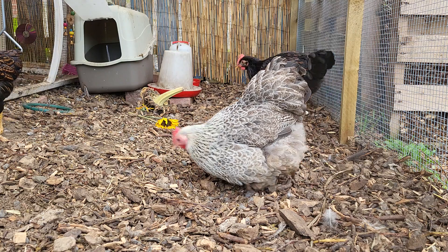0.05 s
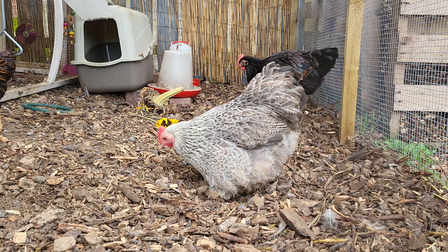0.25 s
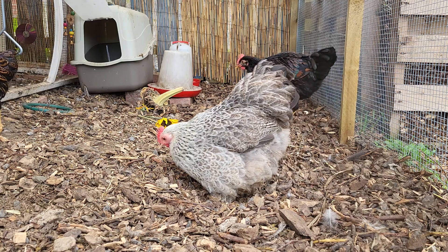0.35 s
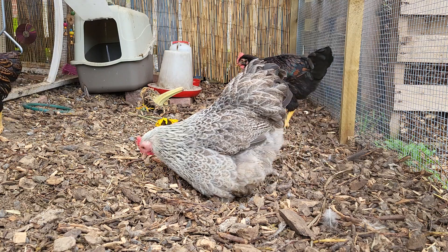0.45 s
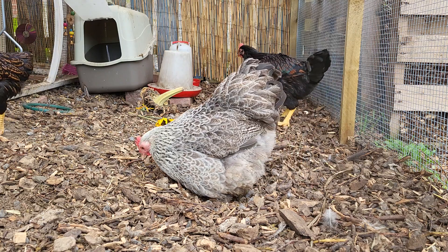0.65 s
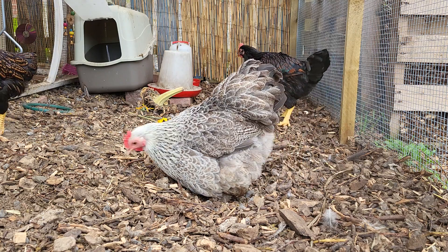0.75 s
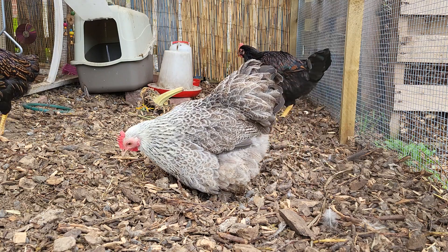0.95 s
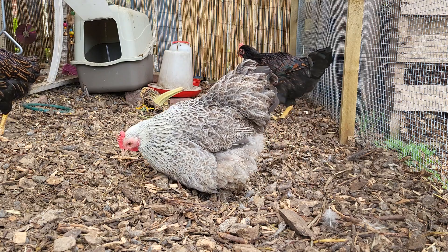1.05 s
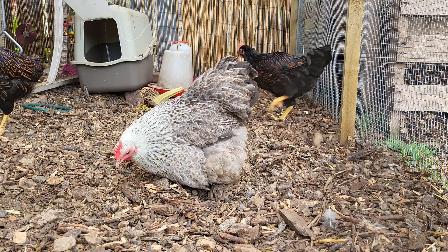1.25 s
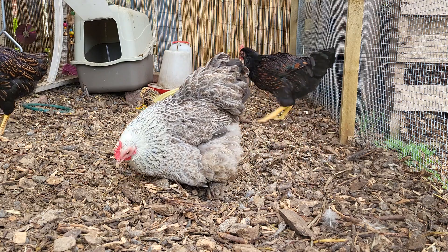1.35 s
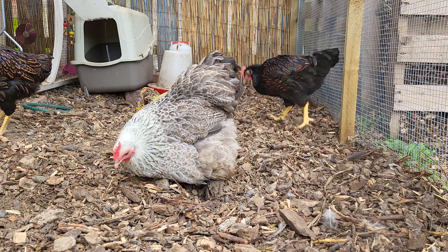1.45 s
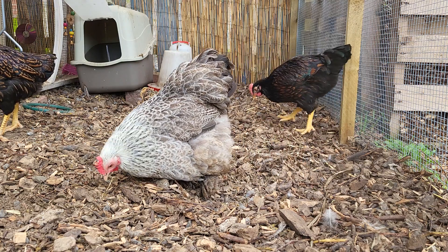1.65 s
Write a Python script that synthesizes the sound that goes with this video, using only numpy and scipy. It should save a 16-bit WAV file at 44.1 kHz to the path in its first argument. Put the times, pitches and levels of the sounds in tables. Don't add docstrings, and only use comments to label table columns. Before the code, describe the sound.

Hen scratching in dry wood chips, a metre or two away. Faint rustles grow from 0.1 s to a loud rake at 0.3 s, where thrown chips clatter on a hollow box, ringing midrange with a short boom. Low foot thuds and small rustles fade by 0.75 s. After a quiet gap, softer raking runs 1.1-1.7 s, with a lighter knock near 1.4 s. Steady low hum, faint rumble, short dull echo.

```python
import sys
import numpy as np
from scipy import signal
from scipy.fft import rfft, irfft
from scipy.io import wavfile
from scipy.ndimage import uniform_filter1d

SR = 44100
rng = np.random.default_rng(int(sys.argv[2]) if len(sys.argv) > 2 else 0)


def linear_from_db(decibels):
    return 10 ** (np.asarray(decibels, float) / 20)


def transcribe(signal):
    frames = np.atleast_2d(signal).T
    limited = np.clip(frames, -1, 1)
    pcm = np.round(limited * 32767).astype(np.int16)
    wavfile.write(sys.argv[1], SR, pcm)


N = 74970
TIME = np.arange(N) / SR
LEFT_AHEAD = np.array([[1], [-1]])


def unit(x):
    return x / np.sqrt(np.mean(x ** 2))


def shaped(x, gain):
    hz = np.maximum(np.fft.rfftfreq(N, 1 / SR), 1)
    return unit(irfft(rfft(x) * gain(hz), N))


def colour(points):
    hz_points, db_points = np.array(points).T
    return lambda hz: linear_from_db(np.interp(np.log(hz), np.log(hz_points), db_points, left=-60))


def bell(centre_hz, width_hz):
    return lambda hz: 1 / (1 + ((hz ** 2 - centre_hz ** 2) / (hz * width_hz)) ** 2)


def swell(start, rise, db, t60):
    since = TIME - start
    attack = np.sin(np.clip(since / rise, 0, 1) * np.pi / 2) ** 2
    decay = 1000. ** (-np.maximum(since - rise, 0) / t60)
    return linear_from_db(db) * attack * decay


def walk(rate):
    k = int(SR / rate)
    steps = np.repeat(rng.standard_normal(N // k + 1), k)
    return unit(uniform_filter1d(uniform_filter1d(steps, k), k)[:N])


def clicks(rate, scatter_db):
    hit = (rng.random(N) < rate / SR) * linear_from_db(scatter_db * rng.exponential(size=N))
    x = hit * rng.standard_normal((2, N))
    return x / np.sqrt(uniform_filter1d(x ** 2, 1500, axis=1))


def pan(x, db):
    return x * linear_from_db(np.array([[db], [-db]]) / 2)


def alike(shared_hz):
    middle = rfft(rng.standard_normal(N))
    own = rfft(rng.standard_normal((2, N)))
    share = 0.94 / (1 + (np.fft.rfftfreq(N, 1 / SR) / shared_hz) ** 1.7)
    return irfft(np.sqrt(share) * middle + np.sqrt(1 - share) * own, N)


def stroke(start, rise, length, db):
    sag_db_per_s, settle_t60_s = 66.5, .12
    settling = np.maximum(TIME - start - length, 0)
    return swell(start, rise, db, 60 / sag_db_per_s) * 1000. ** (-settling / settle_t60_s)


def rakes():
    # start in seconds, swell in seconds, claws lift after seconds,
    # level in dB, tilt in dB per band (positive is brighter).
    first_bout = [(0.028, .03, 0.13, -76, 1.5), (0.113, .05, .06, -60.5, 0.5),
                  (.160, 0.016, 0.045, -51.5, -1), (0.192, 0.01, 0.056, -40, -1),
                  (0.249, .01, 0.067, -47.5, 0.5), (.301, .002, 0.028, -29, -2.5),
                  (.315, .02, 0.066, -33.5, -2), (0.333, 0.014, 0.042, -40, -12), (.39, .01, .03, -54, -11),
                  (.40, .03, .09, -61.5, 3), (0.424, .02, 0.04, -48, 0.5), (.512, .003, .02, -51.5, 1),
                  (.528, .008, 0.028, -55, 2.5), (0.546, 0.0086, 0.029, -46.5, -4),
                  (.6, 0.023, 0.052, -61.5, -3.5), (0.653, 0.0054, .028, -64.5, -2),
                  (0.699, .004, 0.015, -62, -2.5), (.73, 0.0085, .04, -77, 0)]
    second_bout = [(1.083, 0.041, .06, -67.5, 1), (1.124, 0.055, 0.0618, -52, -0.5),
                   (1.158, .024, 0.05, -44.5, 0.5), (1.211, 0.011, .035, -43.5, 1),
                   (1.244, 0.025, .065, -50, -1), (1.301, 0.037, .09, -50.5, -1.5),
                   (1.393, 0.0069, 0.023, -36, -3), (1.431, 0.03, 0.059, -49.5, -1.5),
                   (1.484, .01, 0.031, -51.5, 0.5), (1.514, 0.03, .06, -56.5, 1),
                   (1.574, 0.013, .05, -61, 2.5), (1.626, 0.013, 0.018, -50, -1.5),
                   (1.665, 0.011, .03, -61, 0)]
    # time in seconds, level in dB.
    snap_list = [(0, -58), (.133, -64), (.162, -52), (.2006, -40), (.438, -41), (.5224, -44), (.554, -44),
                 (.629, -59), (1.172, -44), (1.19, -42), (1.263, -48), (.302, -40), (1.140, -49),
                 (1.147, -50), (1.228, -44), (1.49, -49), (1.592, -54), (1.612, -55), (1.628, -50),
                 (1.6346, -37), (1.642, -43)]
    # frequency in Hz, strength in dB per Hz.
    litter = [(1000, -13), (2000, -11), (3200, -4), (7600, 1.5), (8500, -10), (11000, -7), (15700, -5.5),
              (16000, -15)]
    chips_per_s, scatter_db, patchy_db = 12000, 1.5, 1.6
    chips = shaped(clicks(chips_per_s, scatter_db), colour([(500, -50.5)] + litter))

    top = signal.sosfiltfilt(signal.butter(4, 8300, "high", fs=SR, output="sos"), chips)
    low = signal.sosfiltfilt(signal.butter(2, 3000, fs=SR, output="sos"), chips)
    mid = chips - top - low
    top = pan(top, -3.5)

    snap_power = sum(swell(s, .001, db, .018) ** 2 for s, db in snap_list)
    out = 0
    for k, band in zip((-2, 0, 2), (low, mid, top)):
        power = snap_power * linear_from_db(-3 * abs(k) - 2 * k)
        for start, rise, length, db, tilt in first_bout + second_bout:
            power = power + (stroke(start, rise, length, db) * linear_from_db(k * tilt)) ** 2
        patchy = linear_from_db(patchy_db * walk(90))
        out = out + np.sqrt(power) * patchy * band
    return pan(out, -3.4)


def kicks():
    # start in seconds, swell in seconds, level in dB, time to fade 60 dB in seconds, pitch in Hz.
    kick_list = [(0, 0.002, -53.5, 0.014, 2080), (.2, 0.043, -55.5, 0.41, 1500),
                 (0.302, 0.01, -38, 0.22, 1720), (0.309, 0.016, -24.5, 0.28, 2026),
                 (0.326, 0.0022, -26, 0.13, 2330), (0.342, 0.0041, -27.5, 0.088, 2000),
                 (0.364, .02, -35, 0.46, 1860), (0.509, 0.021, -50, 0.306, 1813),
                 (0.546, 0.023, -49.5, 0.205, 1880), (1.211, 0.018, -59.5, 0.24, 2120),
                 (1.388, 0.0052, -36, 0.23, 1900), (1.421, 0.0047, -40, 0.17, 1780),
                 (1.455, 0.012, -52.5, 0.54, 1950), (1.667, 0.005, -61.5, 0.42, 2010)]
    chips_per_s, scatter_db, ring_width_hz, skirt_db = 12000, 1.0, 850, -5
    out = 0
    for start, rise, db, t60, pitch in kick_list:
        ring = bell(pitch, ring_width_hz)
        skirt = bell(1.075 * pitch, 3500)
        hits = shaped(clicks(chips_per_s, scatter_db), lambda hz: ring(hz) + linear_from_db(skirt_db) * skirt(hz))
        out = out + swell(start, rise, db, t60) * hits
    return pan(out, -1.5)


def knocks():
    # time in seconds, level in dB, time to fade 60 dB in seconds, pitch in Hz.
    knock_list = [(.3113, -30, .04, 2020), (.3165, -27, .06, 1800), (.3235, -29, .035, 2450),
                  (.3287, -19, .016, 2550), (.3305, -24, .055, 2170), (.3310, -29, .06, 1500),
                  (.3410, -23, .035, 2050), (.3520, -30, .04, 1600), (.3630, -34, .04, 1850),
                  (.3730, -34, .04, 2050), (.3810, -35, .04, 2000), (.3890, -37, .04, 3000),
                  (1.3915, -38, .09, 2000), (1.3950, -41, .13, 1715), (1.4070, -43, .04, 1950),
                  (1.4240, -45, .05, 1870), (1.4270, -46, .04, 1570), (1.4560, -51, .05, 1800),
                  (1.4800, -49, .03, 2050)]
    rise_s, most_lead_rad = .0015, 1.1
    out = 0
    for start, db, t60, pitch in knock_list:
        lead = most_lead_rad * rng.uniform(-1, 1) * LEFT_AHEAD
        tone = np.sqrt(2) * np.sin(2 * np.pi * pitch * (TIME - start) + lead)
        out = out + swell(start, rise_s, db, t60) * tone
    return pan(out, -1.5)


def rings():
    # start in seconds, swell in seconds, level in dB, time to fade 60 dB in seconds, pitch in Hz.
    ring_list = [
        (.276, .008, -45, .12, 5850),
        (.317, .005, -36, .08, 7000),
        (.520, .006, -49, .1, 13000),
        (.522, .008, -53, .1, 15300),
        (1.139, .002, -63, .04, 3000),
        (.366, .006, -42, .08, 7000),
    ]
    out = 0
    for start, rise, db, t60, pitch in ring_list:
        x = shaped(alike(3 * pitch), bell(pitch, .06 * pitch))
        loudness = uniform_filter1d(x ** 2, int(6 * SR / pitch), axis=1)
        out = out + swell(start, rise, db, t60) * x / np.sqrt(loudness + .05)
    return pan(out, -1.5)


def booms():
    # start in seconds, swell in seconds, level in dB, time to fade 60 dB in seconds, pitch in Hz.
    boom_list = [
        (0.309, 0.03, -36.5, 0.45, 574),
        (0.312, 0.021, -41.5, 0.72, 1000),
        (0.323, 0.035, -35, 0.69, 458),
        (0.343, .04, -49, 1.2, 214.8),
        (.37, 0.05, -43, 2.6, 61.9),
        (.42, 0.038, -46, 0.93, 438),
        (.585, 0.037, -63, 1.8, 420),
        (1.394, 0.024, -51, 0.65, 930),
        (1.396, 0.014, -52.5, 1.05, 423),
        (1.403, 0.021, -57, 0.64, 190),
    ]
    out = 0
    for start, rise, db, t60, pitch in boom_list:
        body = shaped(alike(420), bell(pitch, .64 * pitch))
        out = out + swell(start, rise, db, t60) * body
    return pan(out, 1.0)


def thuds():
    # start in seconds, swell in seconds, level in dB, time to fade 60 dB in seconds, pitch in Hz.
    thud_list = [(.354, .012, -41, .08, 130), (.385, .012, -40, .07, 95), (.408, .02, -38, .12, 60),
                 (.414, .012, -37, .1, 90), (.457, .012, -37, .1, 128), (.534, .012, -41, .07, 100),
                 (.535, .012, -44, .08, 135), (.612, .015, -42, .14, 65), (.75, .012, -46, .1, 125),
                 (.520, .045, -49, .16, 612), (.365, .015, -42, .1, 445), (.36, .015, -46, .15, 170),
                 (.32, .03, -47, .2, 48)]
    most_lead_rad = .45
    out = 0
    for start, rise, db, t60, pitch in thud_list:
        lead = most_lead_rad * rng.uniform(.16, 1) * LEFT_AHEAD
        tone = np.sqrt(2) * np.sin(2 * np.pi * pitch * (TIME - start) + lead)
        out = out + swell(start, rise, db, t60) * tone
    return pan(out, 2.5)


def roofed_run(x):
    t60_s, damp_hz, echo_db = .12, 2460, -13.5
    n = int(.6 * SR)
    tail = rng.standard_normal((2, n)) * 1000. ** (-np.arange(n) / SR / t60_s)
    tail = signal.lfilter(*signal.butter(1, damp_hz, fs=SR), tail)
    tail = tail / np.sqrt(np.sum(tail ** 2, axis=1, keepdims=True))
    return linear_from_db(echo_db) * signal.fftconvolve(x, tail, axes=1)[:, :N]


def hum():
    # pitch in Hz, level in dB.
    hum_lines = [
        (100.2, -44),
        (200.4, -62.5),
        (300.6, -74),
        (400.8, -73.5),
    ]
    wobble_db = 1
    out = 0
    for pitch, db in hum_lines:
        tone = np.sqrt(2) * np.sin(2 * np.pi * pitch * TIME + 3.58)
        out = out + linear_from_db(db + wobble_db * walk(19)) * tone
    return out


def yard():
    # frequency in Hz, strength in dB per Hz.
    yard_tone = [(25, -23), (60, -5), (130, -15), (550, -36), (1000, -34.5), (2100, -54), (4500, -59),
                 (7000, -55), (15800, -61.5)]
    level_db = -52.5 + .75 * walk(2)
    return linear_from_db(level_db) * shaped(alike(259.4), colour(yard_tone))


def scene():
    near = rakes() + kicks() + rings() + knocks()
    return near + roofed_run(near) + booms() + thuds() + hum() + yard()


def band_limit(x):
    return signal.sosfilt(signal.butter(12, 15950, fs=SR, output="sos"), x)


def record(dry):
    opens_s, top_hz = .0087, 15900
    mix = dry * np.clip(TIME / opens_s + .3, 0, 1)
    mix = signal.sosfilt(signal.ellip(8, .2, 60, top_hz, fs=SR, output="sos"), mix)
    return band_limit(mix)


dry = scene()
out = record(dry)
transcribe(out)
```